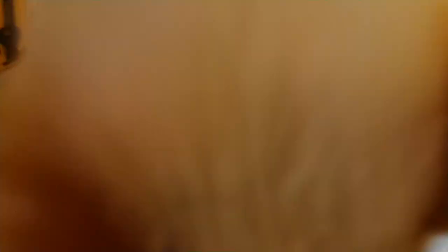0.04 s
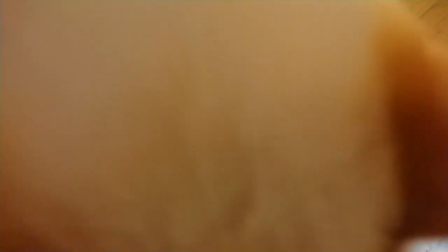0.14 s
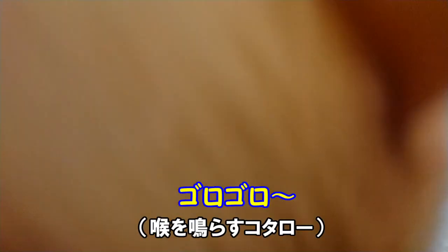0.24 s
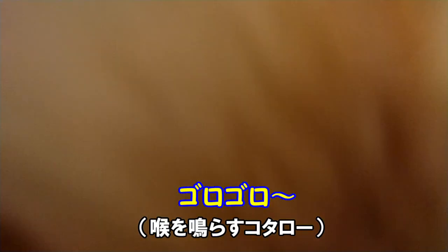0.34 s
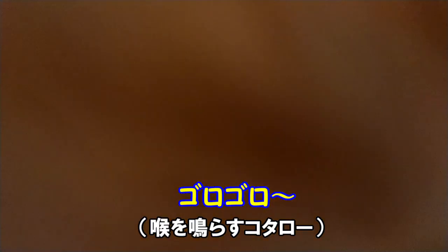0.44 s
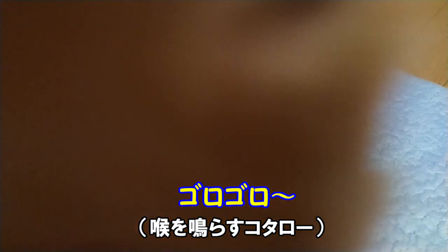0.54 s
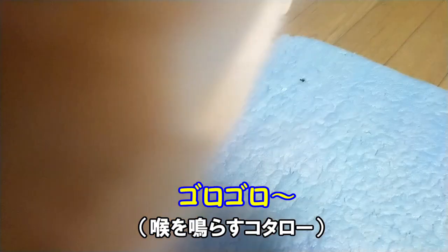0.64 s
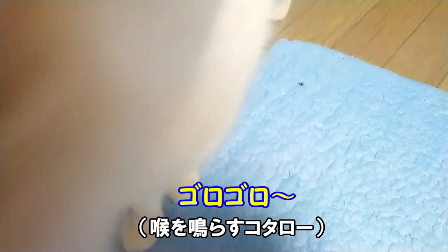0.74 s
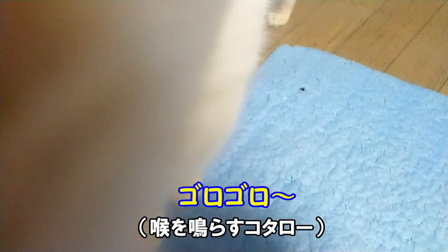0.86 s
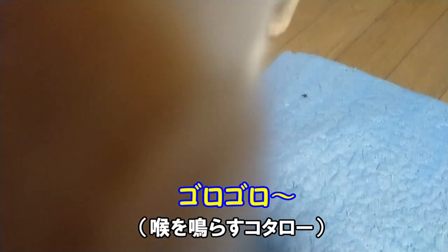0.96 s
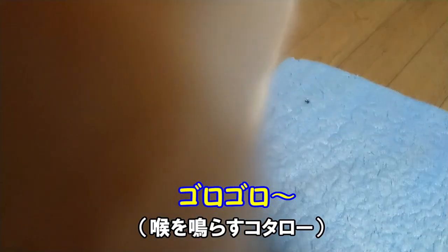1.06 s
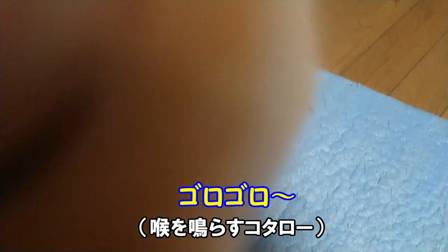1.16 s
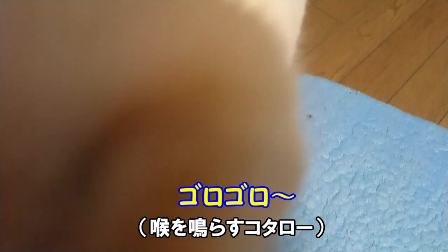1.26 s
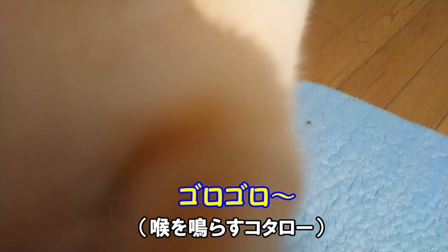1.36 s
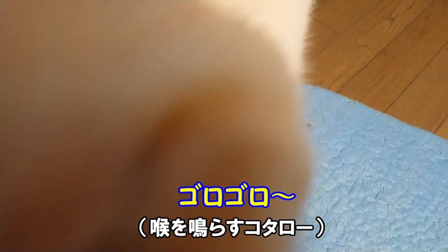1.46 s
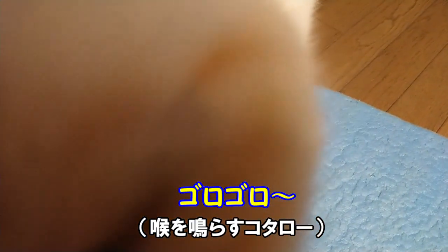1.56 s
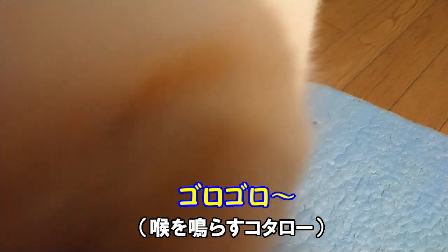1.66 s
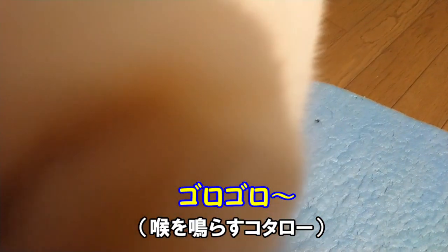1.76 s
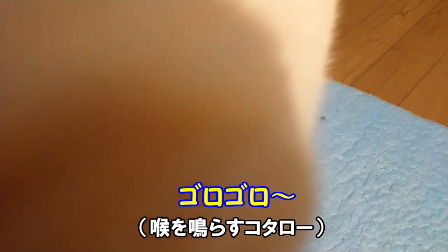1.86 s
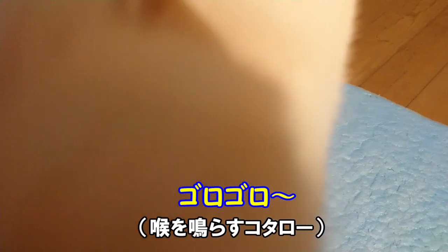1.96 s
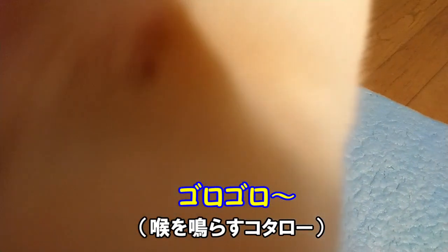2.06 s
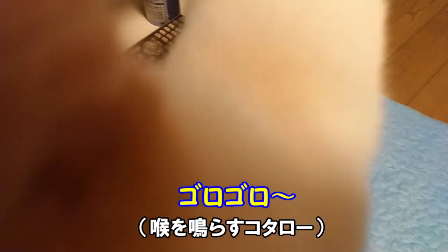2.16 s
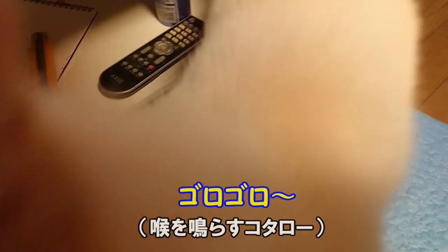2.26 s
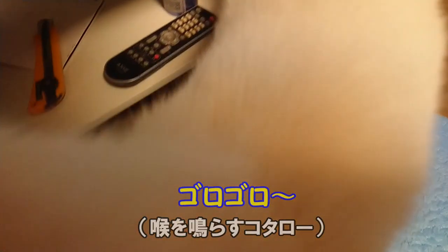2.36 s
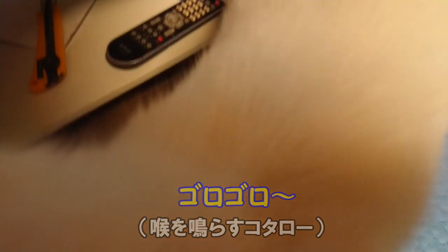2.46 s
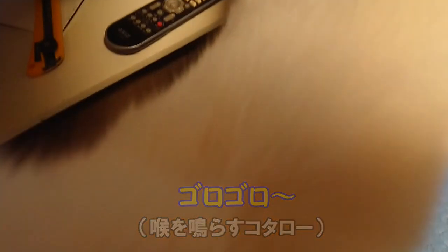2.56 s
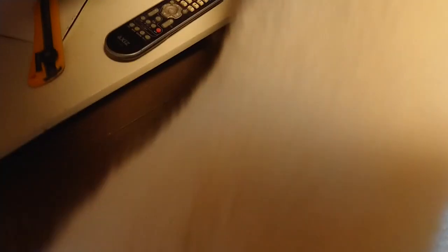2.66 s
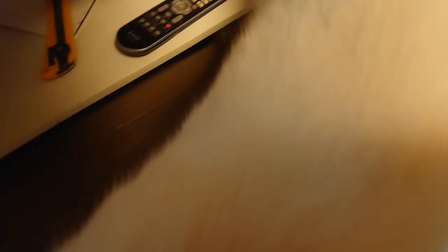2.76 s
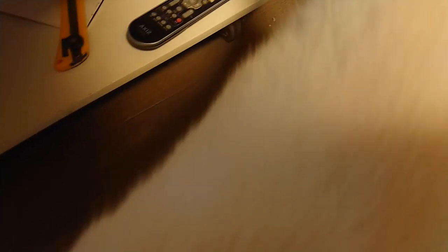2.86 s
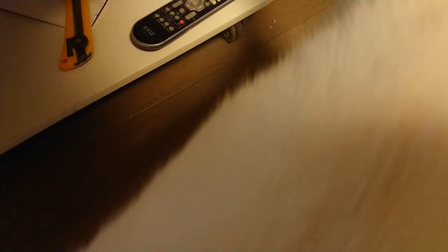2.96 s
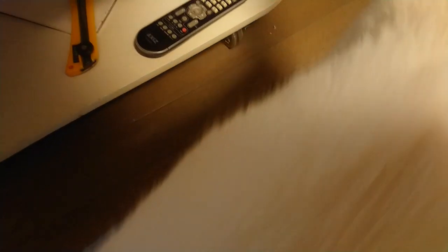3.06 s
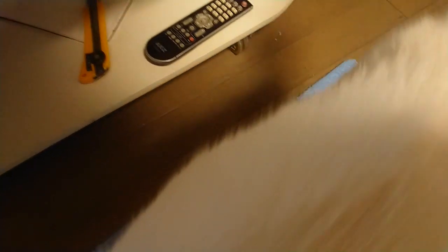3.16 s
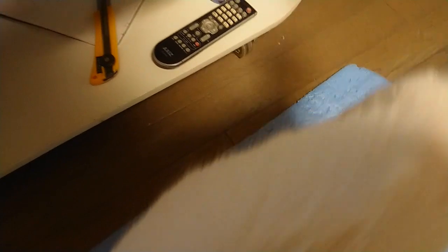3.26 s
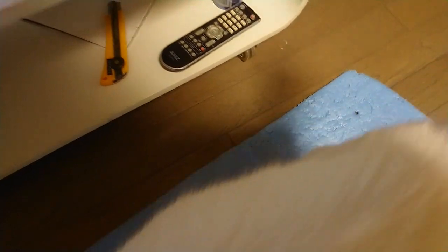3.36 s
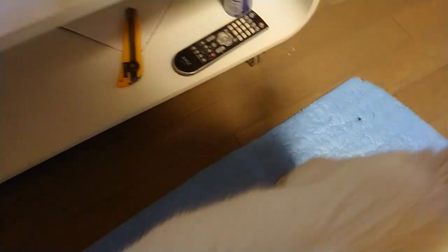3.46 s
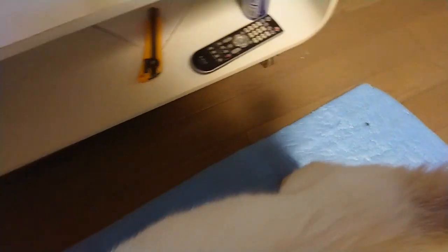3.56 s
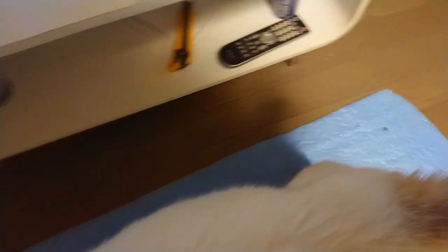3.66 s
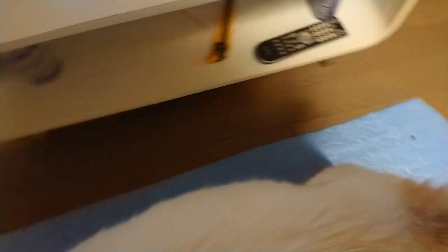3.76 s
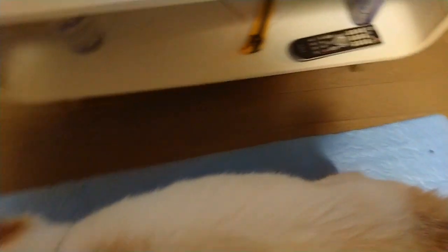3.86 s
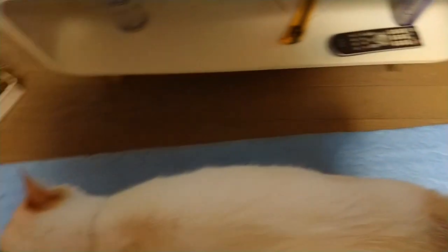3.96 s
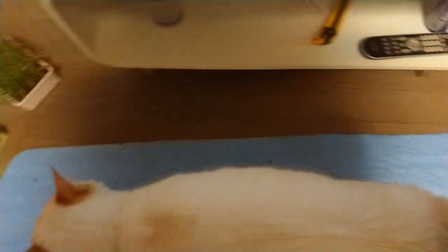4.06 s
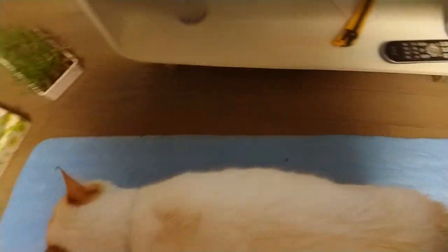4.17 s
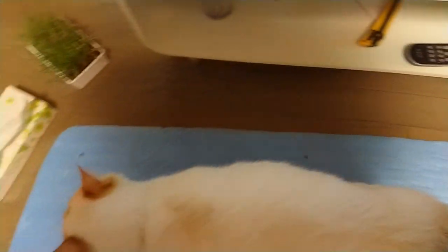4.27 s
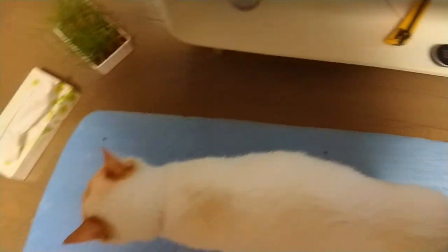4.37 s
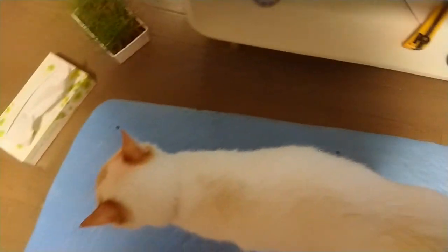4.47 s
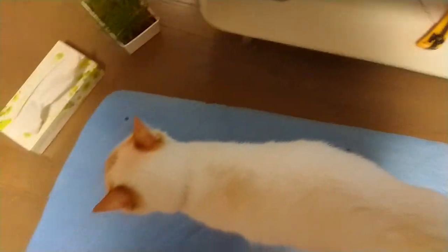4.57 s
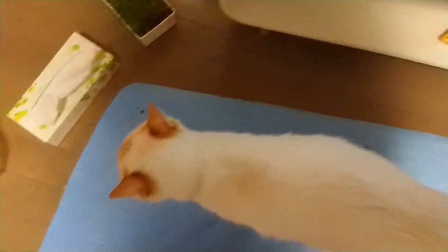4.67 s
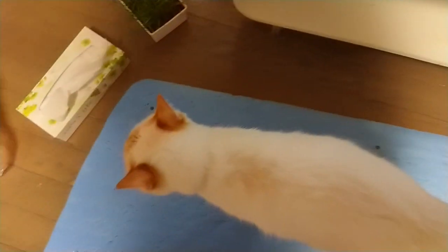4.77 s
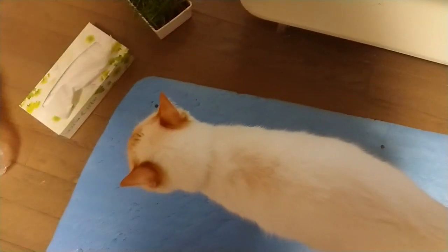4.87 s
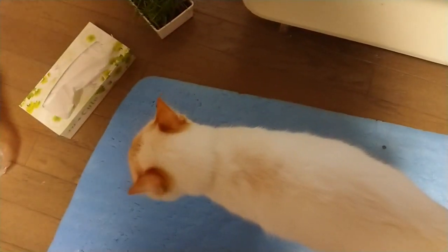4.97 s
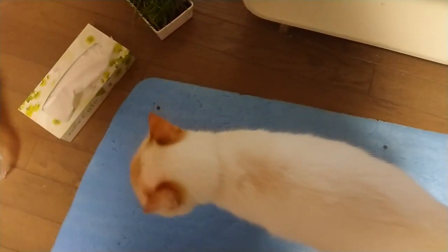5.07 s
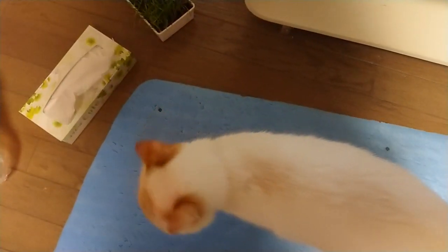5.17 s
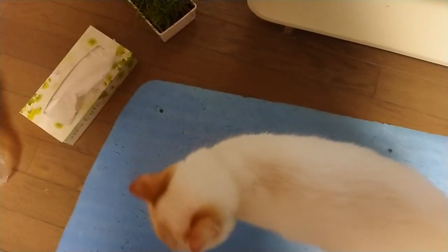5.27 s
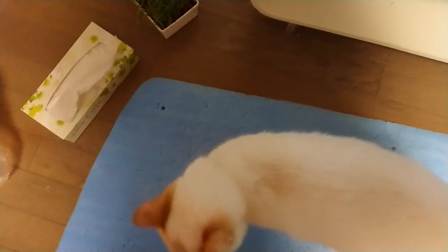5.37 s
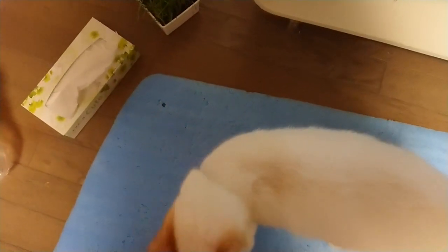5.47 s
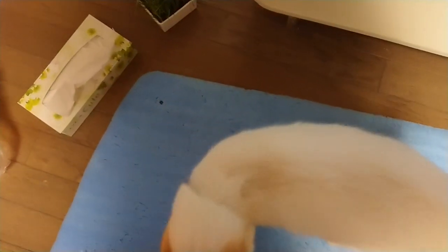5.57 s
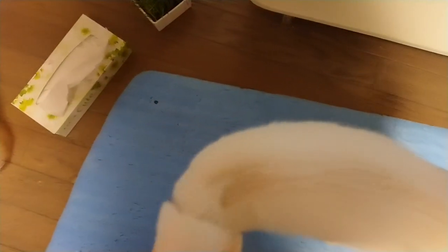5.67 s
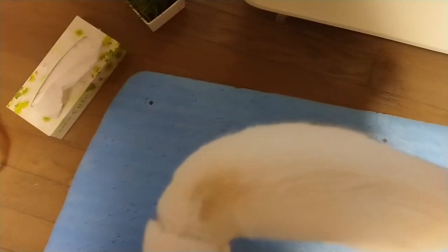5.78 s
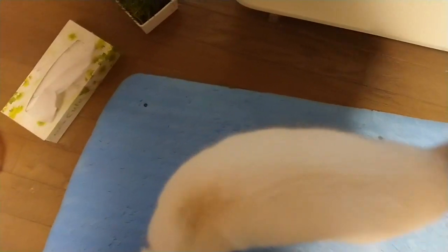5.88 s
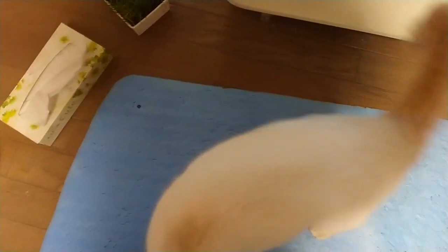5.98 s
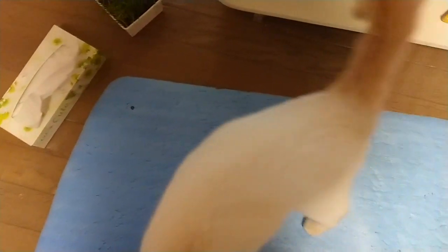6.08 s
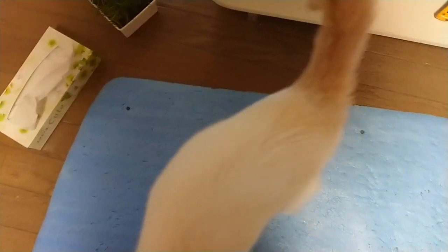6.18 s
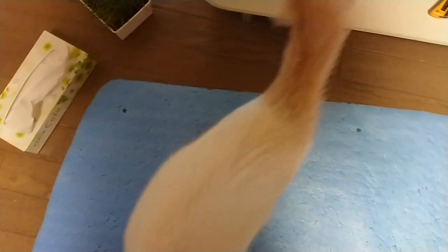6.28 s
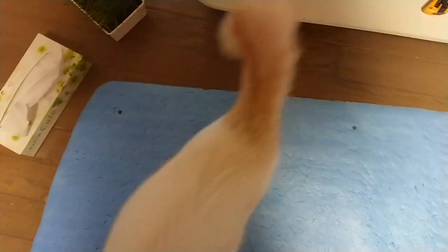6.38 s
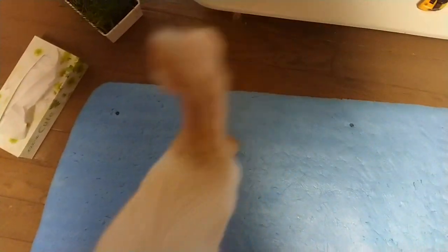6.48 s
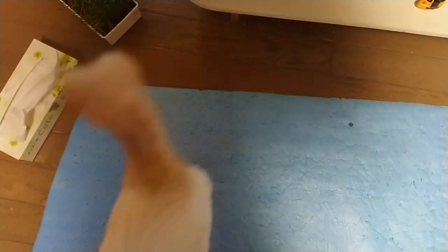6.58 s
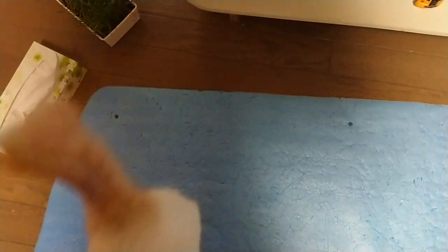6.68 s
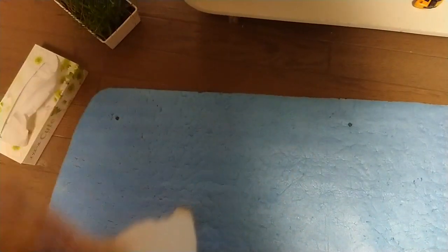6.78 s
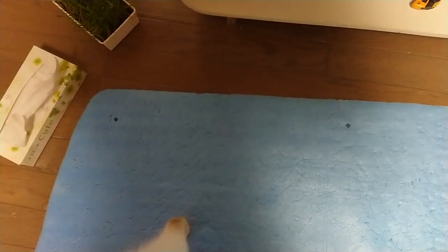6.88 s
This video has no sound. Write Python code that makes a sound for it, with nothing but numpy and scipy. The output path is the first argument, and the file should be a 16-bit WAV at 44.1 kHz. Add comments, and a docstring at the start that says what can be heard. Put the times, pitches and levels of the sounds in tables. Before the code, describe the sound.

Loud, rattling cat purr pressed to the left side of the microphone fades to a soft flutter, followed by fur rustling and dry claw ticks.

```python
"""In a room with a foam mat, a cat purrs right against a small camera, then walks off over the mat.
Its throat presses on the left microphone port: each purr beat thumps the port and puffs air through the throat.
The thumps are shaped pulses that ring chest, neck and throat; the breath is noise through throat and nose colours.
Up close, fur rubs as coloured noise; knocks and single strong purr beats add short pushes of pressure.
Further away the purr is a soft flutter in the room, under rustling noise and a run of dry ticks."""
import sys
import numpy as np
from scipy import signal
from scipy.fft import rfft, irfft, next_fast_len
from scipy.io import wavfile
from scipy.ndimage import map_coordinates

SR = 44100
rng = np.random.default_rng(int(sys.argv[2]) if len(sys.argv) > 2 else 0)


def wav_out(sig):
    """Save sig, one row per channel (or a flat mono array), as 16-bit PCM at SR to the path in sys.argv[1]."""
    wavfile.write(sys.argv[1], SR, np.round(np.clip(np.atleast_2d(sig).T, -1, 1) * 32767).astype(np.int16))


N = 305613


def amp(db):
    """Decibels to gain."""
    return 10 ** (np.asarray(db) / 20)


def unit(x):
    """Scaled to rms 1."""
    return x / np.sqrt(np.mean(x ** 2) + 1e-20)


def along(points, hz):
    """(Hz, value) points read on a log axis."""
    f, v = np.transpose(points)
    return np.interp(np.log(hz + 1), np.log(f + 1), v)


def curves(rows):
    """One value per sample for each column after the time."""
    s, *cols = np.transpose(rows)
    return [np.interp(np.arange(N) / SR, s, c) for c in cols]


def wobble(rate):
    """A smooth random curve, rate knots a second."""
    return map_coordinates(rng.standard_normal(N // 10), [np.arange(N) * rate / SR], mode="wrap")


def coloured(x, spectrum):
    """x through a causal (minimum-phase) filter with this spectrum and unit power gain."""
    m = 2 * next_fast_len(N // 2 + SR // 4)
    gain = unit(amp(along(spectrum, np.fft.rfftfreq(m, 1 / SR))))
    # folding the cepstrum onto positive times makes the filter causal
    cepstrum = irfft(np.log(gain + 1e-6))
    cepstrum[1:m // 2] *= 2
    cepstrum[m // 2 + 1:] = 0
    return irfft(rfft(x, m) * np.exp(rfft(cepstrum)), m)[..., :N]


def resonate(x, modes):
    """x through (Hz, width, dB) resonances of alternating sign, with unit power gain."""
    m = next_fast_len(N + SR // 2)
    f = np.fft.rfftfreq(m, 1 / SR)
    body = 0
    for k, (hz, width, db) in enumerate(modes):
        damping = 1j * f * width
        body = body + (-1) ** k * amp(db) * damping / (hz * hz - f * f + damping)
    return irfft(rfft(x, m) * body / np.sqrt(np.mean(abs(body) ** 2)), m)[..., :N]


def dulled(x, hz):
    """x with the treble above hz rolled off."""
    return signal.lfilter(*signal.butter(2, min(hz, SR / 3), fs=SR), x)


def pair(alike):
    """Left and right white noise with a shared part."""
    alike = np.clip(alike, 0, 1)
    return np.sqrt(alike) * rng.standard_normal(N) + np.sqrt(1 - alike) * rng.standard_normal((2, N))


def sides(lr_db):
    """Left and right gains; the louder side is 1."""
    return amp(np.minimum([[lr_db], [-lr_db]], 0))


def add(track, s, sound):
    """Mix a sound into a track from time s."""
    i = int(np.clip(round(s * SR), 0, N - 1))
    track[..., i:i + sound.shape[-1]] += sound[..., :N - i]


def swell(s, rise, hold, fall, slope_db=0):
    """Gain that is full at s, slopes (dB a second) while held, then fades; rise and fall each span 20 dB."""
    age = np.arange(N) / SR - s
    rising = 20 * np.minimum(age, 0) / rise
    held = slope_db * np.clip(age, 0, hold)
    falling = 20 * np.maximum(age - hold, 0) / fall
    return amp(rising + held - falling)


# The room's decay. Each row: frequency in Hz, time to fall 60 dB in seconds.
ROOM_DECAY = [(100, 0.33), (1000, 0.25), (10000, 0.16)]


def room(x):
    """The room's answer in each ear: a noise tail whose treble and bass die at their own speeds."""
    hz, t, z = signal.stft(rng.standard_normal((2, SR // 2)), SR, nperseg=256)
    decay = amp(-60 * t / along(ROOM_DECAY, hz)[:, None])
    tail = signal.istft(z * decay, SR, nperseg=256)[1]
    return signal.fftconvolve(np.atleast_2d(x), tail / np.linalg.norm(tail[0]), axes=1)[:, :N]


# How the two microphone ports differ. Each row: frequency in Hz, left over right in dB.
PORT_BALANCE = [(160, 2), (600, 7), (4200, -0.5), (6300, -7.5), (15000, 5)]


def ports(x):
    """Sound from the room as the two ports colour it."""
    m = next_fast_len(N + SR // 4)
    lr_db = along(PORT_BALANCE, np.fft.rfftfreq(m, 1 / SR))
    return irfft(rfft(x, m) * amp(np.array([lr_db, -lr_db]) / 2), m)[:, :N]


# Colour of the hiss behind everything. Each row: frequency in Hz, relative level in dB per Hz.
HISS_COLOUR = [(100, -4), (300, -25), (550, -9.5), (750, -22.5), (1700, -19.5), (4200, -34), (5600, -40.5),
               (6600, -29), (8000, -31), (11500, -26.5), (13500, -53.5), (16000, -29)]


def hiss(level_db=-74.0):
    """Steady coloured noise, nearly independent at the two ports."""
    return amp(level_db) * coloured(pair(0.067), HISS_COLOUR)


# Colour of the faint low rumble. Each row: frequency in Hz, relative level in dB per Hz.
RUMBLE_COLOUR = [(20, -27.5), (45, -0.5), (65, -1.5), (105, -3), (160, -15), (400, -60)]


def rumble(level_db=-66.5, drift_db=1.7):
    """Low noise of the room and the hand-held case, its level drifting a little."""
    return amp(level_db + drift_db * wobble(20)) * coloured(pair(0.37), RUMBLE_COLOUR)


# Paws, and the hand on the camera. Each row: time in seconds, level in dB.
THUDS = [(2.775, -57.5), (3.235, -58), (2.549, -56.5), (4.421, -54), (4.781, -55), (6.06, -54),
         (6.111, -61.5), (6.53, -62), (6.801, -54.5), (6.85, -59)]
# Colour of those bumps. Each row: frequency in Hz, relative level in dB per Hz.
THUD_COLOUR = [(25, -19), (60, -0.5), (140, 1), (250, -6.5), (500, -18.5), (2000, -54)]


def thuds(rise_s=0.023, hold_s=0.0019, fall_s=0.072):
    """Dull, low bumps that boom briefly in the floor: swells of low noise."""
    envelope = sum(amp(db) * swell(s, rise_s, hold_s, fall_s) for s, db in THUDS)
    return coloured(pair(0.77) * envelope, THUD_COLOUR)


# Soft scuffs of paws and cloth, out in the room.
# Each row: start in seconds, level in dB before the gain, 60 dB decay in seconds, hollow note in Hz.
SCUFFS = [(3.937, -46, 0.094, 1920), (4.314, -67.5, 0.12, 990), (4.341, -63.5, 0.33, 1420),
          (4.601, -66, 0.026, 4100), (5.708, -61.5, 0.041, 2400), (5.979, -59.5, 0.025, 1220),
          (6.018, -55, 0.027, 520), (6.048, -59.5, 0.039, 517), (6.54, -54.5, 0.069, 521)]
# Colour of the scuffs. Each row: frequency in Hz, relative level in dB per Hz.
SCUFF_COLOUR = [(150, -24), (350, -42), (520, -2.5), (720, -2.5), (1000, 2.5), (1500, -3), (2200, -4),
                (4000, -5), (12000, -40)]


def scuffs(rise=0.0058, hollow=1.27, sharpness=2.7, gain_db=6, wet_db=-4.0):
    """Soft brushes of noise that swell quickly and fade, each with its own hollow note."""
    t = np.arange(SR // 3) / SR
    track = np.zeros((2, N))
    noise = pair(0.067)[:, :len(t)]
    for s, db, length, hz in SCUFFS:
        grit = np.roll(noise, rng.integers(len(t)), axis=1)
        grit = grit * amp(db + gain_db - 60 * t / length) * (1 - np.exp(-t / rise))
        note = signal.lfilter(*signal.iirpeak(hz, sharpness, fs=SR), grit)
        add(track, s, grit + hollow * note)
    brush = coloured(track, SCUFF_COLOUR)
    return brush + amp(wet_db) * room(brush)


# Dry ticks in the room, like claws catching in the mat. Each row: time in seconds, level in dB.
TICKS = [(4.7854, -48), (4.806, -48), (4.8334, -46.5), (4.878, -44), (4.912, -44.5), (4.945, -43.5),
         (4.9774, -44), (5.0, -44), (5.021, -49.5), (5.062, -42), (5.0857, -45.5), (5.1153, -46),
         (5.1469, -45.5), (5.183, -45.5), (5.2333, -43), (5.337, -44), (5.427, -45)]
# Colour of the ticks. Each row: frequency in Hz, relative level in dB per Hz.
TICK_COLOUR = [(300, -19), (1000, -2), (1800, 3.5), (3000, 8), (5700, 1), (6600, 7.5), (10000, -2.5),
               (15000, -16.5)]


def ticks(t60=0.018, wet_db=-5, trail_db=-15, trail_t60=0.183):
    """Short bright snaps of noise, each trailed by a soft, longer tail of noise in the room."""
    t = np.arange(SR // 5) / SR
    envelope = np.zeros(N)
    for s, db in TICKS:
        snap = amp(db - 3 - 60 * t / t60)
        trail = amp(db + trail_db - 60 * t / trail_t60)
        add(envelope, s + 0.0016, snap + trail)
    snaps = coloured(pair(0.1) * envelope, TICK_COLOUR)
    return snaps + amp(wet_db) * room(snaps)


# Quick whisks of fur. Each row: time of the peak in seconds, level in dB, width in seconds.
WHISKS = [(2.001, -52.5, 0.005), (2.07, -54.5, 0.0039), (2.158, -52, 0.00087), (3.944, -40.5, 0.0092),
          (4.488, -63, .006), (4.508, -54, 0.0067)]
# Colour of the whisks. Each row: frequency in Hz, relative level in dB per Hz.
WHISK_COLOUR = [(300, -7), (8000, -1), (15000, -9)]


def whisk(skirt=0.085, skirt_db=-16):
    """Very bright swishes of noise that swell and fade as fur whisks past."""
    t = np.arange(N) / SR
    envelope = np.zeros(N)
    for s, db, width in WHISKS:
        away = abs(t - s)
        envelope += amp(db) * (np.exp(-away / width) + amp(skirt_db) * np.exp(-away / skirt))
    return envelope * coloured(pair(0.056), WHISK_COLOUR)


# Strokes of fur and mat nearby.
# Each row: time at full strength in seconds, rise in s, hold in s, body level in dB, sheen level in dB.
STROKES = [(0.37, 0.74, 0.14, -66, -70), (0.753, 1, 0.92, -72.5, -74), (1.758, 0.44, 0.46, -70.5, -69.5),
           (2.55, 0.038, 0.013, -87, -70), (2.688, 0.036, 0.055, -72, -71.5),
           (2.929, 0.033, 0.0095, -74.5, -67.5), (3.093, 0.39, 0.092, -69.5, -70.5),
           (3.498, 0.23, 0.23, -63.5, -58.5), (3.94, 0.095, 0.0054, -54.5, -56),
           (4.37, 0.27, 0.034, -74, -68), (4.478, 0.0089, 0.01, -60.5, -58.5),
           (4.79, 0.022, 0.14, -64, -71), (4.958, 0.22, 0.39, -65.5, -69.5), (5.35, 0.11, 0.11, -69.5, -74),
           (5.94, 0.27, 0.15, -72.5, -72), (6.112, 0.013, 0.042, -70, -66),
           (6.461, 0.016, 0.14, -70, -70.5), (6.883, 0.1, 0.073, -74.5, -74.5)]
# Papery body of the rustle. Each row: frequency in Hz, relative level in dB per Hz.
BODY_COLOUR = [(150, -18), (450, 4), (800, -0.5), (1300, 1.5), (2300, 1.5), (4000, 1), (6000, -14.5),
               (12000, -29)]
# Fine sheen of the rustle, and of the case's fizz. Each row: frequency in Hz, relative level in dB per Hz.
SHEEN_COLOUR = [(2000, -41), (4500, -1), (5800, -9.5), (6500, 7.5), (7500, -1.5), (10500, -5.5),
                (12500, -16.5), (15500, -27)]


def rustle(grain_db=1.5, fall_s=.18, floor_db=-82):
    """Fur and mat brush together: a papery body and a fine sheen share the same catches."""
    strokes = [amp([[body_db], [sheen_db]]) * swell(s, rise, hold, fall_s)
               for s, rise, hold, body_db, sheen_db in STROKES]
    body_gain, sheen_gain = np.maximum(np.max(strokes, axis=0), amp(floor_db))
    catches = unit(amp(grain_db * wobble(900) + 1.9 * wobble(60)))
    body = coloured(pair(0.035) * catches * body_gain, BODY_COLOUR)
    sheen = coloured(pair(0.13) * catches * sheen_gain, SHEEN_COLOUR)
    return body + sheen


# Purr through the air, muffled while the body covers the camera and fading as the cat walks off.
# Each row: time in seconds, level in dB before the port colouring.
AIRBORNE_LEVEL = [(0, -56), (.29, -57), (.35, -52.5), (.6, -46.5), (.8, -51), (.95, -58.5), (1.8, -56),
                  (1.89, -45), (2.3, -53.5), (2.37, -62), (2.48, -62.5), (2.68, -58.5), (2.74, -64),
                  (2.78, -54), (2.89, -70), (3.05, -51), (3.1, -60.5), (3.21, -60.5), (3.24, -54),
                  (3.55, -53), (3.67, -61.5), (3.79, -54), (4.08, -59), (4.3, -67), (4.7, -67.5),
                  (5.2, -62.5), (5.6, -71), (6.92, -66)]
# Dull, boomy colour of the purr in the room. Each row: frequency in Hz, relative level in dB per Hz.
FLUTTER_COLOUR = [(30, -30), (55, -5), (85, -5), (125, -1), (150, 5.5), (175, 0), (205, -3), (290, -9.5),
                  (450, -23), (700, -35), (3000, -75)]


def airborne_purr(beats, scatter_db=3, second_db=-5, wet_db=-9, breathy=0.051, jitter=.002):
    """Folds open and close, two dull uneven pulses a cycle, heard directly and off the floor and furniture."""
    t = np.arange(SR // 25) / SR
    track = np.zeros((2, N))
    gaps = np.diff(beats, append=N / SR)
    for s, gap, r in zip(beats, gaps, rng.standard_normal((len(beats), 4))):
        opening = s + jitter * r[3], scatter_db * r[0]
        closing = s + gap * (.48 + .07 * r[1]), second_db + scatter_db * r[2]
        for start, db in (opening, closing):
            pulse = breathy * rng.standard_normal((2, len(t))) * amp(-60 * t / 0.087)
            pulse[:, 0] -= 1
            add(track, start - .002, amp(db) * pulse)
    direct = coloured(track, FLUTTER_COLOUR)
    return unit(unit(direct) + amp(wet_db) * unit(room(direct))) * amp(curves(AIRBORNE_LEVEL)[0])


# Bright fizz of the case, at the right port. Each row: time in seconds, level in dB.
CASE_FIZZES = [(0.099, -57.5), (0.469, -50.5), (0.875, -43), (1.737, -49), (1.918, -48), (2.531, -46.5)]


def case_fizz(rise_s=0.00045, fall_s=0.008):
    """Bright fizz of the case and right port as a knock lands: very short swells of noise."""
    envelope = sum(amp(db) * swell(s, rise_s, 0, fall_s) for s, db in CASE_FIZZES)
    return coloured(envelope * rng.standard_normal(N), SHEEN_COLOUR) * sides(-26.0)


# Knocks on the case and single strong purr beats or recoils, right at the ports.
# Each row: time in seconds, peak level in dB, left over right in dB, dull above this many Hz.
KNOCKS_AND_BEATS = [(0.097, -39.5, -37, 2730), (.627, -19.5, 45, 1580), (0.872, -29.5, -29, 2950),
                    (.91, -28, 29, 3000), (1.447, -29.5, 21, 4530), (1.015, -23.5, 35, 1080),
                    (1.361, -25, 35, 1500), (1.929, -36, 14, 4140), (2.055, -34.5, 32, 2970),
                    (2.161, -28, 36, 1460), (2.257, -32, 18, 450), (2.304, -32, 9, 443),
                    (2.311, -44.5, 5, 2500), (2.347, -38.5, 37, 9050), (2.5327, -29, -12, 3800),
                    (3.946, -43, 6, 1200), (4.778, -34, 8, 613)]


def knocks_and_strong_beats(crack_t60=0.003, crack=0.38, scrape=0.052):
    """Knocks on the case and single strong purr beats or recoils: a push of pressure, a crack, a faint scrape."""
    t = np.arange(SR // 20) / SR
    track = np.zeros((2, N))
    for s, db, lr_db, dull_hz in KNOCKS_AND_BEATS:
        push = (1 - t / 0.00013) * np.exp(-t / 0.00037)
        roughness = crack * amp(-60 * t / crack_t60) + scrape * amp(-60 * t / 0.029)
        grit = rng.standard_normal(len(t)) * roughness
        blow = dulled(push * min(1, 2000 / dull_hz) + grit, dull_hz)
        add(track, s, amp(db) * sides(lr_db) * blow / abs(blow).max())
    return track


# The cat draws air against the left port, rasping.
# Each row: first beat in seconds, quickens after in s, end in s, pull level in dB, rasp level in dB.
IN_BREATHS = [(.726, .706, .807, -23.5, -45), (1.105, 1.165, 1.303, -17.5, -31.5),
              (1.5765, 1.6, 1.7, -31, -45.5), (1.946, 1.965, 2.05, -39, -70)]
# It lets the air out again, smoothly.
# Each row: first beat in seconds, rate in beats a second, hold in seconds, level in dB.
OUT_BREATHS = [(0.514, 28.5, 0.19, -48), (0.831, 28.1, .2, -25.5), (1.3245, 27.5, 0.11, -28.5),
               (1.723, 27.3, 0.11, -34), (2.18, 25, 0.125, -44.5)]
# An in-breath starts slow and turns quick: two rates in beats a second.
IN_RATES = (25.1, 28.9)
# off the port the purr alternates between two rates (beats a second), one for each direction of the air
FREE_RATES, BREATH_S, LEAVES_PORT_S = (25.5, 28.3), .222, 2.34
IN_LEAD_S = 0.034  # the pull begins this long before the first beat
FLOW_LATE = 1.3  # exponent: the air flow builds up more slowly than the pull


def beat_rates():
    """(first beat s, beats a second) of every stretch; an in-breath has a slow and a quick one."""
    slow, quick = IN_RATES
    near = [(s, rate) for s, rate, _, _ in OUT_BREATHS]
    for s, quickens, _, _, _ in IN_BREATHS:
        near += [(s, slow), (s + np.ceil((quickens - s) * slow) / slow, quick)]
    first_near = min(near)[0]
    free = [(s, FREE_RATES[k % 2]) for k, s in enumerate(np.arange(0, N / SR, BREATH_S))
            if not first_near < s < LEAVES_PORT_S]
    return sorted(near + free)


def purr_beats():
    """Times at which the vocal folds snap open, evenly within each stretch of a breath."""
    stretches = beat_rates()
    ends = [s for s, _ in stretches[1:]] + [N / SR]
    return np.concatenate([np.arange(s, end - .5 / rate, 1 / rate)
                           for (s, rate), end in zip(stretches, ends)])


def purr_cycle(beats):
    """How far each moment lies between one beat and the next, 0-1."""
    return np.interp(np.arange(N) / SR, beats, np.arange(len(beats))) % 1


def progress(t, first, end):
    """How far an in-breath has got at time t, 0-1."""
    return np.clip((t - first + IN_LEAD_S) / (end - first + IN_LEAD_S), 0, 1)


def arches(late=1):
    """The pull of each in-breath, rising from 0 to 1 and back; late above 1 delays the top."""
    t = np.arange(N) / SR
    return np.array([abs(np.sin(np.pi * progress(t, s, end) ** late)) for s, _, end, _, _ in IN_BREATHS])


def intake(arch=1.5):
    """Air flow through the throat, strongest just after the middle of each in-breath."""
    return amp([row[4] for row in IN_BREATHS]) @ arches(FLOW_LATE) ** arch


def outflow(rise_s=0.014, fall_s=0.1, sag_db_per_s=8.5):
    """How hard the outgoing air drives the left port: it sets in quickly, sags a little, then dies away."""
    return np.max([amp(db) * swell(s, rise_s, hold, fall_s, -sag_db_per_s)
                   for s, _, hold, db in OUT_BREATHS], axis=0)


# Fur dragged across the left port. Each row: time at full strength in seconds, hold in s, level in dB.
PORT_RUBS = [(0.739, 0.052, -46), (0.848, 0.059, -48), (1.188, 0.09, -38.5), (1.348, 0.13, -54),
             (1.622, 0.033, -49.5), (1.991, 0.37, -47)]
# Colour of the rubs. Each row: frequency in Hz, relative level in dB per Hz.
RUB_COLOUR = [(30, -33), (160, 11.5), (350, 24.5), (600, 8.5), (1200, 8), (2000, 4.5), (5500, 3),
              (6700, 5.5), (10000, 2.5), (14000, -21)]


def port_rub(beats, grain_db=4, shake_db=1, rise_s=0.033, fall_s=0.03, sag_db_per_s=28.5):
    """Hairs slip over the left port in tiny uneven catches of noise, shaken by the purr."""
    drag = sum(amp(db) * swell(s, rise_s, hold, fall_s, -sag_db_per_s) for s, hold, db in PORT_RUBS)
    shake = shake_db * np.cos(2 * np.pi * purr_cycle(beats))
    slips = unit(amp(grain_db * wobble(1500) + 3.9 * wobble(140) + shake))
    return coloured(drag * slips * rng.standard_normal(N), RUB_COLOUR) * sides(39)


# Air escapes as the folds part, snap, recoil and flap. Each row: seconds after the beat, level in dB.
PUFFS = [(-.0052, -0.5), (-.0005, -5.5), (.0075, -6.5), (0.016, -4.5)]
# Colour of the air spat through the nose. Each row: frequency in Hz, relative level in dB per Hz.
NOSE_COLOUR = [(100, 9.5), (400, 21), (560, 5), (750, 0), (1100, 4.5), (1550, -1), (1900, -18),
               (3000, -14.5), (3900, -14), (4350, -5), (4900, -25.5), (5900, -20), (6600, -18),
               (11000, -26), (14000, -52)]


def sputter(beats, gain_db=-2, leak=0.016, burst_t60=0.016):
    """On the way out each beat spits a few tiny bursts of air through the nose, over a weak steady leak."""
    t = np.arange(SR // 25) / SR
    envelope = np.full(N, float(leak))
    for s, r in zip(beats, rng.standard_normal((len(beats), len(PUFFS), 2))):
        for (delay, db), (late, size) in zip(PUFFS, r):
            add(envelope, s + delay + .0004 * late, amp(db + 2 * size - 60 * t / burst_t60))
    air = coloured(envelope * outflow() * rng.standard_normal(N), NOSE_COLOUR)
    return amp(gain_db) * air * sides(39)


# The still narrow throat as a breath sets in. Each row: resonance in Hz, width in Hz, relative level in dB.
NARROW_THROAT = [(157, 90, 5.5), (387, 230, 1), (960, 270, -6.5)]


def gurgle(beats, gain_db=3, late_s=0.0054, rise_s=0.027, hold_s=0.071, fall_s=0.11, dull_hz=1500):
    """Each in-breath starts with a low, wet rattle of resonant noise before the throat opens."""
    cycle = purr_cycle(beats)
    onset = sum(amp(db) * swell(s + late_s, rise_s, hold_s, fall_s) for s, _, _, _, db in IN_BREATHS)
    catches = unit(amp(7 * np.cos(2 * np.pi * (cycle + .08)) + 4 * wobble(700)))
    rattle = resonate(onset * catches * rng.standard_normal(N), NARROW_THROAT)
    return amp(gain_db) * dulled(rattle, dull_hz) * sides(41)


# The throat against the port. Each row: resonance in Hz, width in Hz, relative level in dB.
THROAT = [(395.3, 35, 22), (1230, 440, 8), (2310, 130, 3.5), (2600, 230, 5.5)]


def rasp(beats, open_at=0.66, pop_at=0.29, pop=6, pop_hz=2350, gain_db=3, dull_hz=7000):
    """Air rattles through the throat once a cycle, with a wet pop as the folds peel apart."""
    cycle = purr_cycle(beats)
    flow = unit(amp(7 * np.cos(2 * np.pi * (cycle - open_at)) + wobble(200) + 4.5 * wobble(1400)))
    breath = dulled(resonate(flow * rng.standard_normal(N), THROAT), dull_hz)
    # pops need a strong pull; each rings briefly and roughly, gliding upwards
    age = np.maximum(cycle - pop_at, 0)
    pitch = pop_hz * (1 + .05 * wobble(28) + .09 * wobble(1100) + np.minimum(age, .15))
    burst = np.exp(-age / .05) - np.exp(-age / .02)
    pull = arches(FLOW_LATE).max(axis=0) ** 3
    roughness = amp(3 * wobble(28) + 2 * wobble(900))
    wet = burst * pull * roughness * np.sin(2 * np.pi * np.cumsum(pitch) / SR)
    return (breath + pop * wet) * amp(gain_db) * intake() * sides(41)


def contact_purr(beats, gain_db=7.0, chest_hz=57.5, chest_db=-13, neck_hz=160, neck_db=-9,
                 throat_hz=490, throat_db=-13, edge_s=0.00073, suck_s=0.002, push_s=0.0042,
                 sharpen_db=9, suck_db=3):
    """Each beat is a suction that flips into a push and rings chest, neck and throat; drawn air sharpens it."""
    t = np.arange(-SR // 50, SR // 6) / SR
    after = np.maximum(t, 0)

    def ring(hz, t60, age):
        """A dying sine."""
        return np.sin(2 * np.pi * hz * age) * amp(-60 * age / t60)

    def bump(centre, width):
        """A smooth bell in time."""
        return np.exp(-((t - centre) / width) ** 2)

    track = np.zeros(N)
    for s, r in zip(beats, rng.standard_normal((len(beats), 5))):
        # 0 while slack, 1 from the middle of an in-breath; tight folds shorten the edge, push and throat ring
        tight = sum(min(2 * progress(s, first, end), 1) for first, _, end, _, _ in IN_BREATHS if s < end)
        soft = amp(-sharpen_db * tight)
        suction = amp(2 * r[1] + suck_db * tight) * bump(0, suck_s)
        push = np.exp(-(after / (push_s * soft * amp(r[0] / 2))) ** 4)
        flip = np.tanh(t / (edge_s * soft)) * np.where(t < 0, suction, push)
        # slack folds part a little before the main snap and recoil after it
        parting = -.55 * bump(-.0036, .0012)
        recoil = -.3 * amp(4 * r[2]) * bump(.007 + .0006 * r[3], .001)
        chest = -amp(chest_db) * ring(chest_hz, .2, np.maximum(t - .006, 0))
        neck = amp(neck_db) * tight * ring(neck_hz, .05, after)
        throat = amp(throat_db) * ring(throat_hz * (1 + .05 * r[4]), .02, after / soft)
        add(track, s + t[0], flip + (1 - tight) * (parting + recoil) + chest + neck + throat)
    pressure = outflow() + amp([row[3] for row in IN_BREATHS]) @ arches()
    return amp(gain_db) * track * pressure * sides(55)


def scene():
    """The purr by contact and by air, the sounds on the case and a faint rumble and hiss."""
    beats = purr_beats()
    background = rumble() + hiss()
    movement = thuds() + scuffs() + ticks() + whisk() + rustle()
    around = ports(background + movement + airborne_purr(beats))
    on_the_case = case_fizz() + knocks_and_strong_beats() + port_rub(beats)
    purr = sputter(beats) + gurgle(beats) + rasp(beats) + contact_purr(beats)
    return around + on_the_case + purr


def record(dry, low_cut_hz=36, top_hz=15800):
    """The camera thins the deepest bass and keeps nothing above its band limit."""
    thinned = signal.lfilter(*signal.butter(2, low_cut_hz, "high", fs=SR), dry)
    m = next_fast_len(N + SR // 2)
    kept = np.fft.rfftfreq(m, 1 / SR) < top_hz
    return irfft(rfft(thinned, m) * kept, m)[:, :N]


dry = scene()
out = record(dry)
wav_out(out)
```